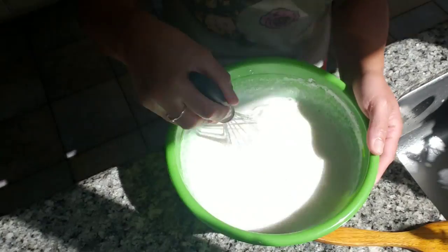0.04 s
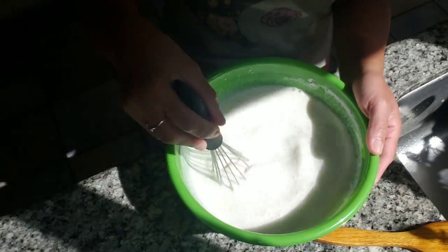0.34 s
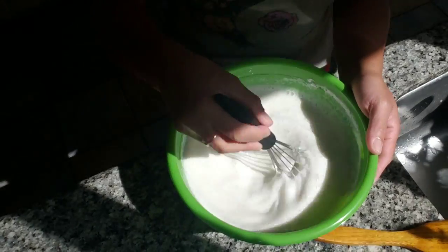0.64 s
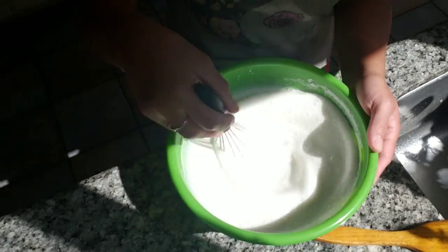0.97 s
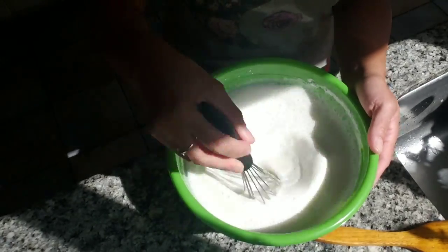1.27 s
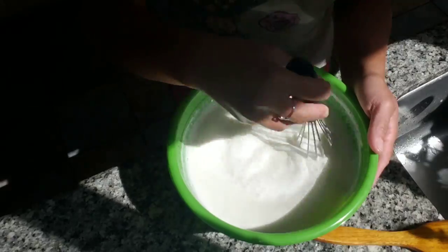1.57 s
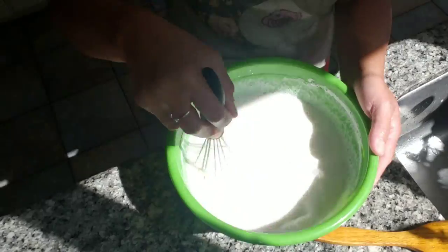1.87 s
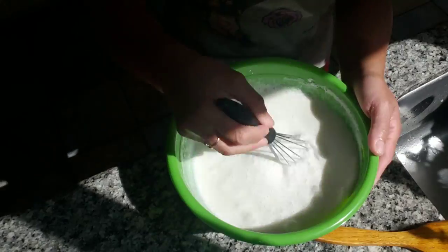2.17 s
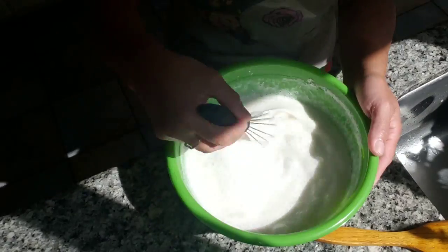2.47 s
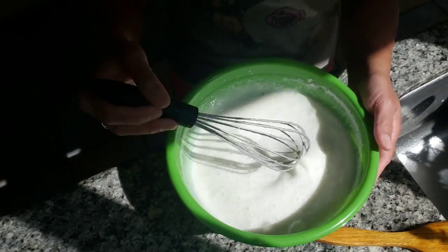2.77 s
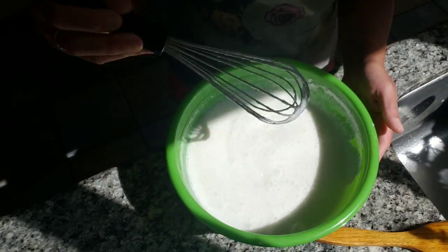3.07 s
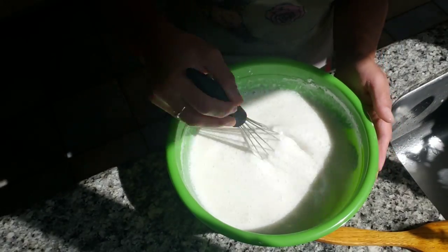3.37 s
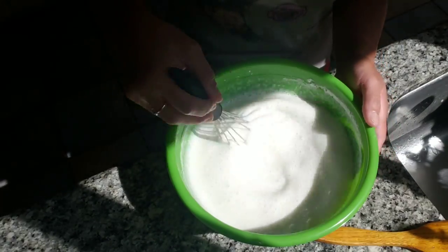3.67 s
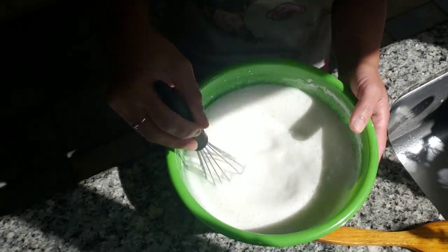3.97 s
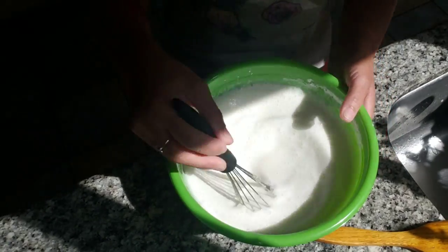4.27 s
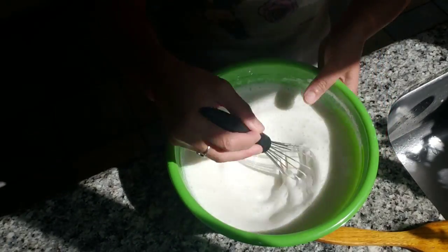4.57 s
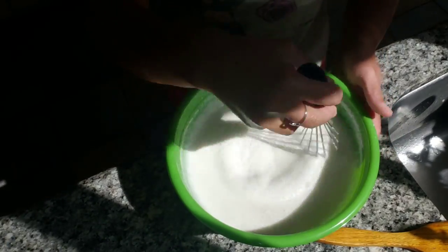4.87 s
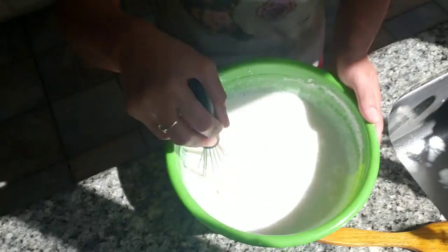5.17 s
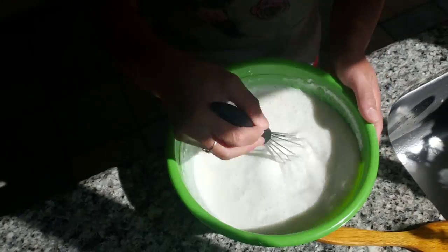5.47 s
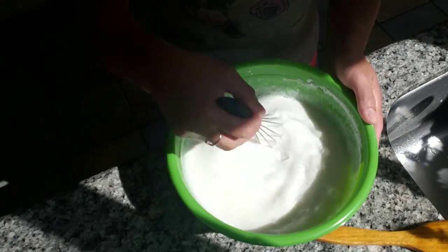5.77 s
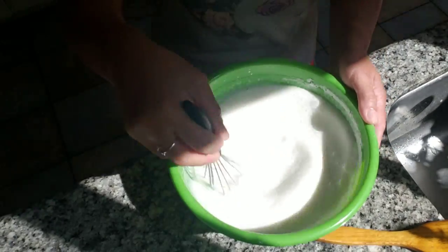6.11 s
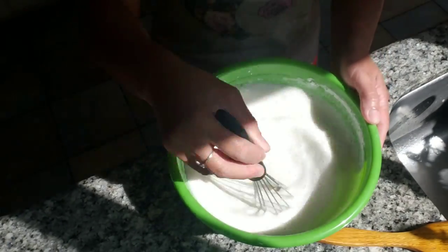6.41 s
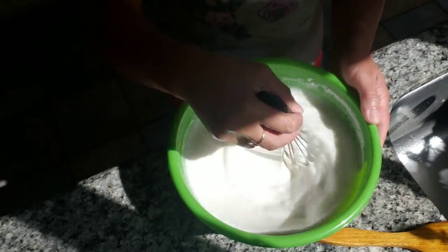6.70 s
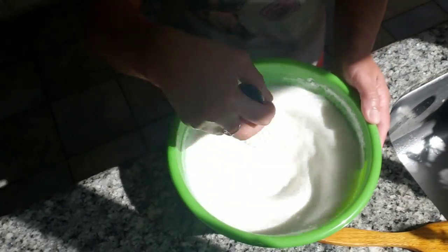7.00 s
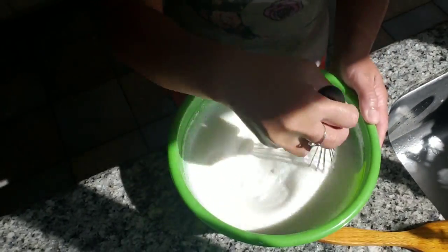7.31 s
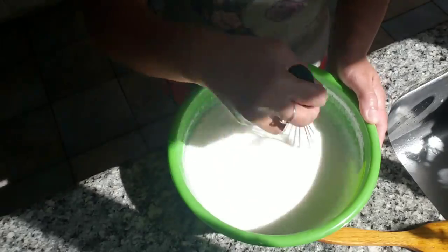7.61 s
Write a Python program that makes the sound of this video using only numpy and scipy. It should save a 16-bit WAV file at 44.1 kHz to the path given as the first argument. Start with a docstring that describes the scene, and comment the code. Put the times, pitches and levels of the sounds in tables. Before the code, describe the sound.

A wire whisk beats thick, foamy batter in a plastic bowl, heard close and slightly left in a quiet kitchen. It starts with soft wet swishes, fizzing foam and a few light taps. From about 1.5 seconds the wires click and scrape on the bowl in uneven clusters, each a short hollow knock, with a strong one at 2.5 seconds. Small plops and sharp bubble ticks are scattered between the strokes. From about 2.8 to 3.4 seconds the whisking stops, leaving little but a faint electrical hum and room air. Then the knocking, squelching and fizzing resume. From 6 seconds the strokes are busier and louder, with hard knocks near 6.1, 6.8 and 7.4 seconds and a faint dull rumble of the bowl rocking on the stone counter. The whisking continues until the end, at about 8 seconds.

```python
"""Whisking thick batter

A wire whisk folds foamy batter in a plastic bowl on a stone counter, close by in a kitchen.
The wires knock and drag on the bowl and make it ring. Between knocks, air pockets squelch
and tiny bubbles burst, so the foam tears and fizzes. Near 3 s the whisk is lifted out for
a moment, leaving little but a low mains hum; then the whisking goes on."""
import sys
import numpy as np
from scipy import signal
from scipy.fft import rfft, irfft
from scipy.io import wavfile
from scipy.ndimage import uniform_filter1d

SR = 44100
rng = np.random.default_rng(int(sys.argv[2]) if len(sys.argv) > 2 else 0)


def materialize(psi):
    """Save the field psi as 16-bit PCM at rate SR to the path in sys.argv[1].

    A 1-D psi becomes a single channel; in a 2-D psi each row is a channel.
    """
    bounded = np.clip(np.atleast_2d(psi).T, -1, 1)
    quanta = np.round(bounded * 32767).astype(np.int16)
    wavfile.write(sys.argv[1], SR, quanta)


N = 346185
TIME = np.arange(N) / SR


def undb(db):
    """Turn decibels into a number to multiply a sound by."""
    return 10 ** (np.asarray(db) / 20)


def unit(x):
    """Scale a sound so that its average (rms) level is 1."""
    return x / np.sqrt(np.mean(x ** 2))


def at_hz(points, hz):
    """Read a value between the rows of a (Hz, value) table, on a musical pitch scale."""
    f, value = np.transpose(points)
    return np.interp(np.log(hz + 1), np.log(f), value)


def colour(x, points, size=2048):
    """Shape a sound's tone with a table of (Hz, dB) rows."""
    gains = undb(at_hz(points, np.arange(size // 2 + 1) * SR / size))
    cepstrum = irfft(np.log(gains))
    # folding this in half makes the filter ring only after a sound, never before it
    cepstrum[1:size // 2] *= 2
    cepstrum[size // 2 + 1:] = 0
    response = irfft(np.exp(rfft(cepstrum)))
    return signal.oaconvolve(x, response)[:len(x)]


def butter(x, order, hz, kind):
    """Keep the part of a sound above one frequency ("high") or between two ("band")."""
    return signal.sosfilt(signal.butter(order, hz, kind, fs=SR, output="sos"), x)


def wander(per_s):
    """Glide to a new random value, about 1 in size, per_s times a second."""
    hold = int(SR / per_s)
    steps = rng.standard_normal(N)[np.arange(N) // hold]
    return np.sqrt(3 / 2) * uniform_filter1d(steps, hold)


def clicks(n, per_s, spread_db):
    """Random clicks, most of them small and a few large."""
    size = undb(spread_db * np.minimum(rng.exponential(size=n), 5))
    return (rng.random(n) < per_s / SR) * size * np.sign(rng.standard_normal(n))


def add(track, s, sound):
    """Mix a sound into the track, starting at s seconds."""
    i = max(int(s * SR), 0)
    track[i:i + len(sound)] += sound[:max(N - i, 0)]


def at_level(x, db):
    """Set the average level of the first 25 ms of a short sound."""
    return x * undb(db) / np.sqrt(np.mean(x[:SR // 40] ** 2))


def ring(push, notes, detune=.028, contact_db=2):
    """A push rings an object's notes; shifting batter detunes them, each contact spot rebalances them."""
    t = np.arange(len(push)) / SR
    hz, db, fade_s = np.transpose(notes)[:, :, None]
    shift, weight, side = rng.standard_normal((3, len(notes), 1))
    strength = np.sign(side) * undb(db + contact_db * weight)
    waves = strength * np.sin(2 * np.pi * hz * (1 + detune * shift) * t)
    fade = np.exp(-np.log(1000) * t / fade_s)
    return signal.fftconvolve(push, np.sum(waves * fade, axis=0))[:len(t)]


# Wires hitting the bowl. Each row: start in seconds, wall level in dB, then clack, thump and crackle
# in dB above the wall (before the trims in knocks), and drag time in seconds.
WIRE_HITS = [(.348, -63, -3, -1, 4, 0.0034), (.614, -53, 1.5, -1, 4.5, .009),
             (1.063, -57.5, 5.5, -1, -13, .007), (1.565, -42, 6, 0.5, -3, .002),
             (1.687, -45, 4.5, 1.5, -12, 0.00092), (1.741, -43.5, -4, -4, -10, 0.0039),
             (1.878, -53.5, -2, -4, -26, 0.0017), (2.083, -48, -7, -5, -16, 0.018),
             (2.147, -47.5, 2.5, 1, -16, 0.00038), (2.176, -45, -14, -7, -19, 0.0056),
             (2.504, -31.5, -3.5, 1.5, -3, 0.0037), (3.447, -59.5, 1.5, 6, -4, 0.003),
             (3.489, -44, 2, 2.5, -2, .012), (3.531, -52, 12.5, 0, 3, 0.0084),
             (3.631, -44, -1, 3, -6, 0.003), (3.940, -38.5, -10, -7, -10.5, .001),
             (4.084, -42.5, 0, -26, -5.5, 0.015), (4.110, -44, -5, -12, -8, 0.024),
             (4.322, -53.5, 6.5, 3.5, -4.5, 0.0029), (4.365, -50.5, -6, -9, -6.5, 0.0076),
             (4.432, -43.5, 0, -1.5, -13, 0.0024), (4.680, -43, 2, 1, -7, 0.016),
             (4.968, -49, 3, 3.5, -11, 0.0017), (5.038, -42.5, -5.5, -5, -10.5, 0.012),
             (5.380, -43, -7, -11, -19, 0.0029), (5.445, -43.5, 1, -3.5, -19, 0.0014),
             (5.838, -48.5, -3, -4, -28, 0.0025), (6.061, -32, -6.5, -3, -4, 0.0079),
             (6.146, -54, 10, -7, 8.5, 0.0069), (6.213, -40.5, 1, -4, -5, 0.0067),
             (6.239, -37, -3.5, -13, -11.5, 0.0071), (6.318, -40, -10, -11, -10.5, 0.0038),
             (6.396, -52.5, 5, -15, -12, 0.0072), (6.454, -44, 7, 0.5, -1.5, 0.01),
             (6.488, -41.5, -6, -4.5, -25, 0.0065), (6.562, -37, -6.5, -11, -10.5, 0.0085),
             (6.673, -56.5, 8, 10, 2, 0.00081), (6.801, -30.5, -7, -8.5, -4, 0.011),
             (7.029, -46, -11, -14, -19, .01), (7.150, -53, 2.5, 9.5, -7, 0.0011),
             (7.215, -48, -6, -6, -10, 0.0074), (7.268, -54, 1, 4, -31, .002),
             (7.386, -34.5, 6, 1, 5.5, 0.0059), (7.446, -40, -6, -4.5, -8, .001),
             (7.686, -58, 11.5, 6, 5, .0005), (7.727, -40.5, 0, 0, -15, .003)]
# The notes of the full bowl: its base thumps, its wall knocks, its upper side clacks.
# Each row: pitch in Hz, relative level in dB, seconds to fade by 60 dB.
BASE_NOTES = [(111.1, 1, 0.27), (173, 0.5, 0.18), (208.7, 7, 0.089), (270, -19.5, 0.17), (365.4, -3, 0.12),
              (402.4, -5.5, 0.14), (476, 6, 0.09)]
WALL_NOTES = [(553, -7.5, 0.047), (569, -1, 0.058), (685.5, 3.5, 0.044), (761, -5.5, 0.033),
              (785, 0.5, 0.021)]
SIDE_NOTES = [(1000, -6, 0.037), (1057, -6, 0.043), (1346, 4, 0.02), (1310, -4, 0.025), (1501, -7.5, 0.045),
              (1550, -4, 0.021), (1907, -3.5, 0.0086), (1890, -8.5, 0.0061)]
# The tone of crushed foam and of its finest bubbles. Each row: frequency in Hz, relative level in dB.
CRACKLE_TONE = [(900, -23.5), (2000, 17), (2800, 9.5), (4000, 7), (6000, 3), (9000, -5.5), (16000, -18)]
FIZZ_TONE = [(5000, -4), (8000, 2), (10000, -2), (12500, -2.5), (16000, 6.5)]


def knocks(slips_per_s=1400, settle_s=0.0062, thump_rise_s=0.011, crackle_s=0.018,
           clack_trim_db=-1, thump_trim_db=-2, crackle_trim_db=-3, spray_from_db=-38):
    """A wire strikes, then slips along the wall in tiny jerks; the bowl rings and trapped foam crackles."""
    out, t = np.zeros(N), np.arange(SR // 5) / SR
    for s, wall_db, clack_db, thump_db, crackle_db, drag_s in WIRE_HITS:
        # a knock high on the side clacks more and bends the base into its lower notes
        thump_hz = np.clip(341 * 2 ** (-0.11 * clack_db), 250, 407)
        press = np.minimum(.5 + t / drag_s, 1)
        settle = np.exp(-np.maximum(t - drag_s, 0) / settle_s)
        push = 0.36 * press * settle * clicks(len(t), slips_per_s, 0.73)
        # the batter cushions deep, loud strokes, so their first strike is softer
        push[0] += np.clip((-25 - wall_db) / 15, .25, 1)
        # the bowl is too small to give off much sound below its thump
        push = butter(push, 2, 0.23 * thump_hz, "high")
        base_notes = [(hz, db - 24 * abs(np.log2(hz / thump_hz)), fade_s)
                      for hz, db, fade_s in BASE_NOTES]
        # the base is driven through the wall, so it swells a little later
        thump = ring(push, base_notes) * (1 - np.exp(-t / thump_rise_s))
        snap = 2 * push[0] * np.exp(-t / .0015)
        crush = snap + press * np.exp(-np.maximum(t - drag_s / 2, 0) / crackle_s)
        # the harder the foam is crushed, the more of it bursts as fine bright spray
        spray_db = wall_db + crackle_db - spray_from_db
        coarse = colour(crush * clicks(len(t), 6000, 2.8), CRACKLE_TONE)
        spray = colour(crush * clicks(len(t), 6000, 2.8), FIZZ_TONE)
        crackle = at_level(coarse, 0) + at_level(spray, spray_db)
        add(out, s, at_level(ring(push, WALL_NOTES), wall_db))
        add(out, s, at_level(ring(push, SIDE_NOTES), wall_db + clack_db + clack_trim_db))
        add(out, s, at_level(thump, wall_db + thump_db + thump_trim_db))
        add(out, s, at_level(crackle, wall_db + crackle_db + crackle_trim_db))
    return out


# The tone of wet batter and of tearing foam. Each row: frequency in Hz, relative level in dB.
SQUELCH_TONE = [(60, -17.5), (120, 1), (210, 0.5), (300, -8.5), (420, 2.5), (700, -2.5), (930, -6),
                (1300, 1.5), (1900, -9), (2800, -12), (5000, -46.5)]
TEARING_TONE = [(900, -13), (1800, 5), (2600, 0), (3700, 2), (5000, 1.5), (7000, -1), (8500, -8.5),
                (12000, -19.5)]
# The notes of the wire loops. Each row: pitch in Hz, relative level in dB, seconds to fade by 60 dB.
WIRE_NOTES = [(1307, 6.5, 0.076), (2276, -15, 0.031), (3702, 4.5, 0.047)]


def batter(surge_db=1.96):
    """Air pockets collapse around the wires, and countless tiny bubbles burst as the foam is torn."""
    tearing_gain, fizz_gain, squelch_gain = strokes()
    surge = undb(surge_db * wander(45))  # one wire after another cuts the surface
    collapses = clicks(N, per_s=1200, spread_db=2.95)
    squelch = undb(-3.5) * unit(colour(collapses, SQUELCH_TONE)) + undb(-7) * bubbles()
    tears = clicks(N, per_s=6000, spread_db=3.2)
    bursts = clicks(N, per_s=4500, spread_db=3.8)
    tearing = undb(-3) * unit(colour(tears, TEARING_TONE))
    tearing += undb(-17) * unit(ring(tears, WIRE_NOTES, detune=0))  # each tear plucks the loops
    fizz = undb(-1) * unit(colour(bursts, FIZZ_TONE))
    return (tearing * tearing_gain + fizz * fizz_gain + squelch * squelch_gain) * surge


# Pushes through the batter; deep ones squelch, shallow ones fizz. Each row: fastest moment in seconds,
# foam level in dB, slowing time in seconds, squelch in dB above the foam, fizz in dB above the tearing.
# These levels come before the mix in batter.
WHISK_PUSHES = [(.18, -69.5, 0.048, 7.5, -6), (0.328, -55.5, 0.091, 0, -4), (.46, -58.5, 0.24, 3, 2),
                (.60, -53, 0.11, -11, 19), (0.753, -53.5, 0.047, -6, 0.5), (0.978, -51, 0.14, -0.5, 1.5),
                (1.233, -50, 0.04, -3, -1.5), (1.32, -54.5, 0.058, 2, 6), (1.468, -51, 0.13, -0.5, -0.5),
                (1.718, -47.5, 0.053, -3, 6), (1.88, -60.5, 0.053, 7.5, -15), (2.179, -58, 0.061, 5, 0),
                (2.385, -57, 0.033, 2, -3), (2.51, -49.5, 0.094, 5, 0.5), (2.655, -54.5, 0.069, 3, 3),
                (2.743, -58.5, 0.022, 12, -15), (3.49, -52.5, 0.054, 4, 6), (3.66, -65, 0.25, 5.5, -6),
                (3.95, -58.5, 0.25, -9, -1), (4.11, -61, 0.24, 3, 7), (4.39, -56.5, .11, 0.5, 2),
                (4.563, -57, .03, 4.5, 2), (4.68, -51.5, 0.055, 2, 3), (4.778, -53, 0.034, 4, 9),
                (4.968, -52.5, 0.058, -7, 0.5), (5.21, -65, 0.12, 10.5, -19), (5.48, -59, .07, 3.5, -1),
                (5.668, -55, .05, -3, 2), (5.85, -53, 0.12, 0, 4), (6.08, -51, .2, -6, 3),
                (6.46, -50.5, 0.18, 3.5, 8), (6.81, -46, 0.077, -0.5, 4.5), (6.98, -56, 0.23, 3.5, 2),
                (7.169, -59.5, 0.045, 4.5, 4), (7.387, -50.5, 0.14, -3, 4), (7.73, -54, 0.26, -1.5, 3)]


def strokes(lift_s=2.82, return_s=3.43, dip_s=.05, speed_up_share=0.53, roundness=1.18,
            drag_foam_db=-76, drag_squelch_db=-69, settling_db=-76.5):
    """Each push speeds up and dies away; gives the strength of tearing, fizz and squelch over time."""
    # between pushes the whisk still drags while it is dipped in, and the foam settles by itself
    dipped = np.clip(np.maximum(lift_s - TIME, TIME - return_s) / dip_s, 0, 1)
    tearing = dipped * undb(drag_foam_db) ** 2
    fizz = tearing + undb(settling_db) ** 2
    squelch = dipped * undb(drag_squelch_db) ** 2
    for s, db, slowing_s, squelch_db, fizz_db in WHISK_PUSHES:
        away = np.maximum((s - TIME) / speed_up_share, TIME - s) / slowing_s
        near = away < 5
        power = np.zeros(N)
        power[near] = (undb(db) * np.exp(-away[near] ** roundness)) ** 2
        torn = power / (1 + undb(fizz_db) ** 2)
        tearing += torn
        fizz += power - torn
        squelch += power * undb(squelch_db) ** 2
    return np.sqrt([tearing, fizz, squelch])


def air_pocket(hz, cycles, glide):
    """An air pocket opens with one short note that rises a little; the thick batter soon damps it."""
    t = np.arange(SR // 20) / SR
    age = t * hz / cycles
    loudness = np.exp(-2 * age) * (1 - np.exp(-10 * age))
    return loudness * np.sin(2 * np.pi * hz * t * (1 + glide * age))


def bubbles(count=900, low_hz=520, high_hz=3600):
    """Many air pockets open at random moments, the small ones higher and fainter."""
    out = np.zeros(N)
    for when, smallness, strength in rng.random((count, 3)):
        hz = low_hz * (high_hz / low_hz) ** smallness
        gain = undb(np.log(strength + .05)) * np.sqrt(low_hz / hz)
        add(out, when * N / SR, gain * air_pocket(hz, cycles=5, glide=0.046))
    return unit(out)


# Large air pockets. Each row: start in seconds, level in dB, starting pitch in Hz.
LARGE_POCKETS = [(.46, -60, 760), (.534, -51, 696), (1.351, -56, 1210), (1.992, -59, 522),
                 (2.053, -58, 704), (2.128, -52, 1270), (2.437, -49.5, 670), (3.930, -55, 1120),
                 (4.301, -54.5, 1320), (5.347, -48, 690), (6.299, -53, 920), (6.526, -57, 1050)]


def plops():
    """Large air pockets open behind the wires, each with a single plop."""
    out = np.zeros(N)
    for s, db, hz in LARGE_POCKETS:
        add(out, s, at_level(air_pocket(hz, cycles=4, glide=0.03), db))
    return out


# Single sharp pops in the foam. Each row: start in seconds, peak level in dB before the boost.
FOAM_POPS = [(0.839, -48), (1.016, -31), (1.323, -40), (2.2193, -45.5), (3.1413, -60), (4.2182, -46),
             (4.912, -43), (5.528, -46), (5.947, -35.5), (6.1466, -29), (6.397, -30), (7.2419, -53)]


def pops(burst_s=0.0031, boost_db=4):
    """Larger foam bubbles snap with a short bright tick."""
    out, t = np.zeros(N), np.arange(1024) / SR
    for s, db in FOAM_POPS:
        snap = colour(rng.standard_normal(len(t)) * np.exp(-t / burst_s), FIZZ_TONE)
        add(out, s, snap * undb(db + boost_db) / np.abs(snap).max())
    return out


# Wire loops flicking each other. Each row: start in seconds, level in dB, favoured pitch in Hz.
WIRE_FLICKS = [(0.347, -48, 1520), (.511, -60, 3600)]


def tinks():
    """A loop snaps past its neighbour and rings briefly, damped by the batter."""
    out, flick = np.zeros(N), signal.unit_impulse(SR // 5)
    for s, level_db, loop_hz in WIRE_FLICKS:
        notes = [(hz, db - 12 * abs(np.log2(hz / loop_hz)), fade_s) for hz, db, fade_s in WIRE_NOTES]
        add(out, s, at_level(ring(flick, notes, detune=0), level_db))
    return out


# The bowl shifting under the hand that steadies it. Each row: time in seconds, rumble level in dB.
RUMBLE_LEVELS = [(0, -68), (1.45, -69.5), (1.6, -50), (1.9, -75.5), (3.2, -80.5), (3.6, -64), (4.4, -67.5),
                 (5.85, -77), (6.1, -54), (7.85, -57.5)]


def bowl_rumble(band_hz=(45, 135)):
    """The bowl rocks on the stone counter with a dull rumble."""
    times, db = np.transpose(RUMBLE_LEVELS)
    bumps = clicks(N, per_s=150, spread_db=0.94)
    return unit(butter(bumps, 2, band_hz, "band")) * undb(np.interp(TIME, times, db))


def circling(x, turns_per_s=2.8, spots=11):
    """The whisk circles the bowl, so its sound passes from one spot's echoes to the next."""
    out = np.zeros((2, N))
    for spot in range(spots):
        away = (spots * turns_per_s * TIME - spot + spots / 2) % spots - spots / 2
        share = np.cos(np.pi / 2 * np.minimum(np.abs(away), 1)) ** 1.5
        out += [signal.oaconvolve(x * share, path)[:N] for path in echo_paths()]
    return out


def echo_paths(direct_db=-2, scatter_db=-3.5, room_db=-7, scatter_s=0.0048, treble_hz=900):
    """Sound reaches two microphones directly, then off the bowl and counter, then off the room."""
    t = np.arange(SR) / SR
    echoes = []
    for _ in range(2):
        scatter = clicks(SR, 2700, 0.46) * np.exp(-t / scatter_s) * (t > .001)
        # only short waves bounce off things the size of a bowl
        scatter = butter(scatter, 1, treble_hz, "high")
        scatter /= np.sqrt(np.sum(scatter ** 2))
        echoes.append(undb(scatter_db) * scatter + undb(room_db) * room_echo())
    apart = butter(echoes[1], 1, treble_hz, "high")  # long waves reach both sides alike
    left, right = (echoes[0] + apart) / np.sqrt(2), (echoes[0] - apart) / np.sqrt(2)
    # the left microphone is nearer, so the direct sound gets there a few samples earlier
    left[0] += undb(direct_db)
    right[rng.integers(2, 6)] += undb(direct_db)
    return left, right


# How long the kitchen echoes. Each row: frequency in Hz, seconds to fade by 60 dB.
ROOM_FADE = [(100, 0.73), (500, 0.4), (2000, 0.4), (7000, 0.18), (16000, 0.28)]


def room_echo(build_s=0.012):
    """The kitchen's echoes blur into one tail, each octave dying away at its own rate."""
    t, tail = np.arange(SR) / SR, 0
    for hz in 62.5 * 2 ** np.arange(9):
        octave = [hz / np.sqrt(2), min(hz * np.sqrt(2), SR / 2 - 1)]
        fade = np.exp(-np.log(1000) * t / at_hz(ROOM_FADE, hz))
        tail = tail + butter(rng.standard_normal(SR), 2, octave, "band") * fade
    tail *= np.clip(t / build_s, 0, 1) ** 2
    return tail / np.sqrt(np.sum(tail ** 2))


# The bowl's left-right balance. Each row: frequency in Hz, dB by which the left is louder.
LEFT_LEAD = [(60, -7.5), (110, 3.5), (200, 4.5), (380, 2), (700, 5.5), (1290, 4.5), (2380, 5.5), (4400, 8),
             (8120, 6), (15000, -1)]


def lean_left(stereo):
    """The left microphone is nearer the bowl and hears most frequencies louder."""
    return np.array([colour(channel, [(hz, side * db / 2) for hz, db in LEFT_LEAD])
                     for channel, side in zip(stereo, (1, -1))])


# The tone of the kitchen's air. Each row: frequency in Hz, relative level in dB.
AIR_TONE = [(20, -39), (45, 4.5), (80, -0.5), (130, -7.5), (250, -5.5), (450, -11), (900, -24.5),
            (2000, -33), (5000, -37), (10000, -53.5), (16000, -23)]
# The mains hum. Each row: pitch in Hz, average level in dB.
HUM_NOTES = [(58.5, -64.5), (117, -75.5)]


def background(air_db=-66, width_db=-8, waver_db=2):
    """Faint room air lies under a slightly wavering mains hum."""
    middle, side = (unit(colour(rng.standard_normal(N), AIR_TONE)) for _ in range(2))
    hum = np.zeros(N)
    for hz, db in HUM_NOTES:
        level = undb(db + waver_db * wander(6.7))
        hum += level * unit(np.sin(2 * np.pi * hz * TIME + 0.4 * wander(1.8)))
    return hum + undb(air_db) * (middle + undb(width_db) * np.array([side, -side]))


def scene():
    """Whisk, bowl and batter sound in the kitchen, over the rumble and the hum."""
    whisking = knocks() + tinks() + batter() + plops() + pops()
    return lean_left(circling(whisking)) + bowl_rumble() + background()


# The tone of the microphones. Each row: frequency in Hz, boost in dB.
MICROPHONE_TONE = [(20, -0.5), (5600, 2), (6400, 5.5), (6900, 10), (7400, 5.5), (8100, -1.5), (9500, 2.5),
                   (12000, 10.5), (16000, 0)]


def record(dry, bottom_hz=35, top_hz=16000):
    """The microphone openings ring near 7 kHz; the deepest bass and the highest treble are cut."""
    heard = np.array([colour(channel, MICROPHONE_TONE) for channel in dry])
    heard = butter(heard, 2, bottom_hz, "high")
    return signal.sosfilt(signal.ellip(10, .2, 80, top_hz, fs=SR, output="sos"), heard)


dry = scene()
out = record(dry)
materialize(out)
```